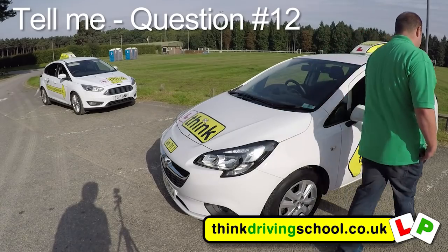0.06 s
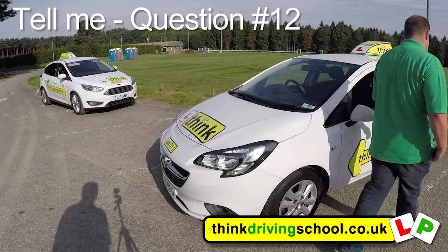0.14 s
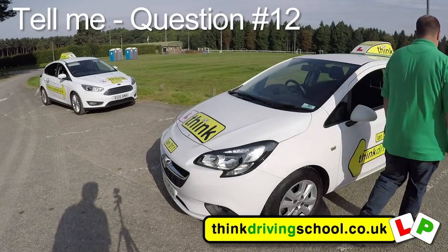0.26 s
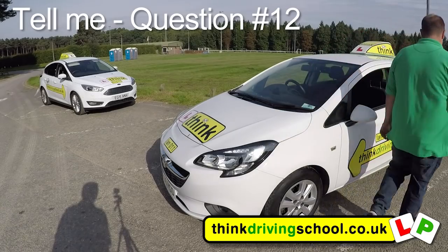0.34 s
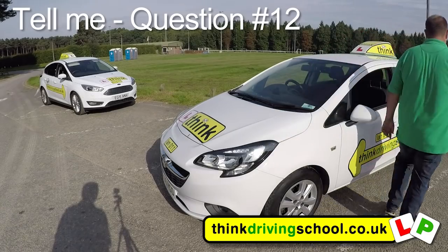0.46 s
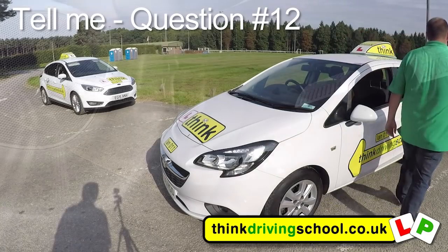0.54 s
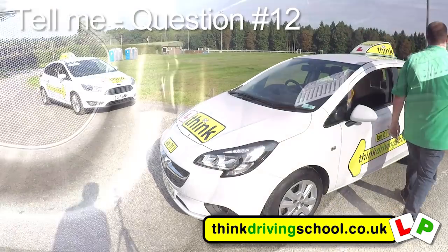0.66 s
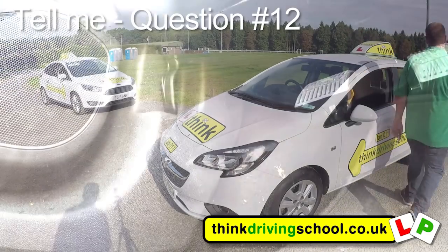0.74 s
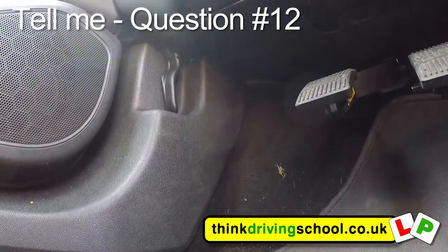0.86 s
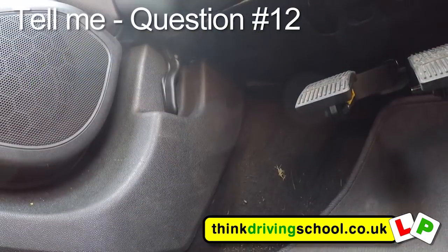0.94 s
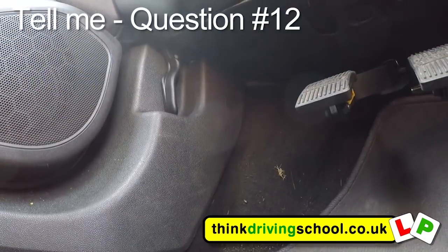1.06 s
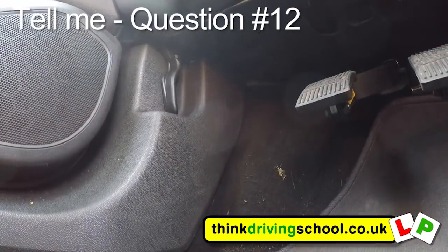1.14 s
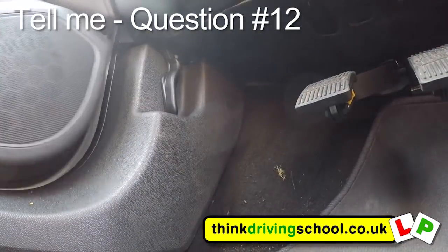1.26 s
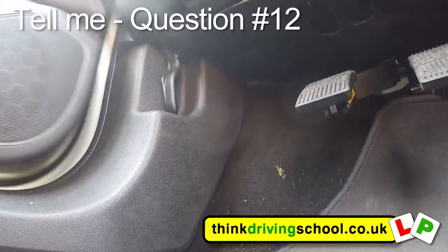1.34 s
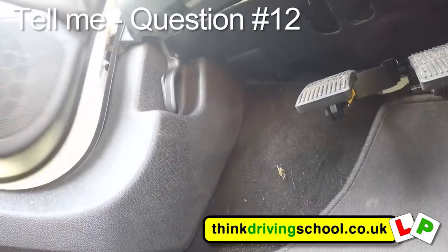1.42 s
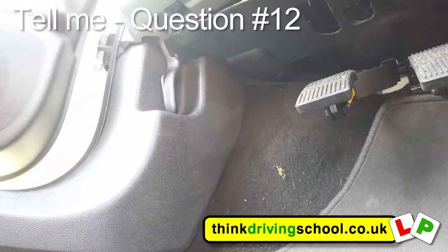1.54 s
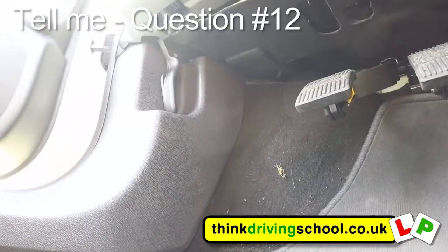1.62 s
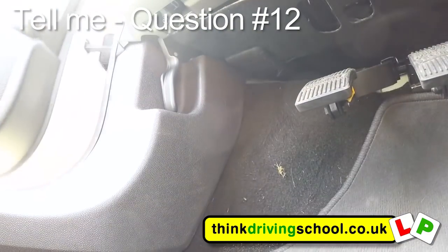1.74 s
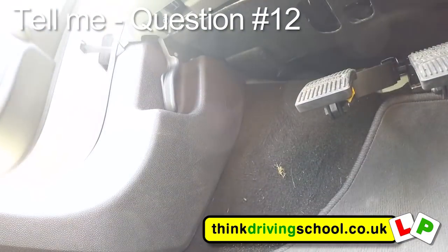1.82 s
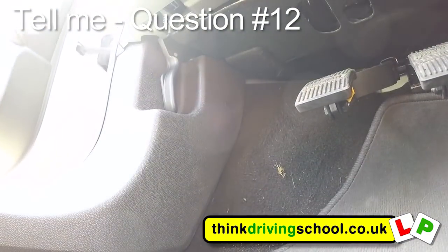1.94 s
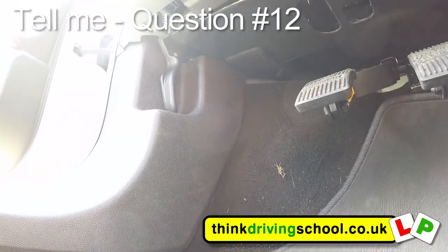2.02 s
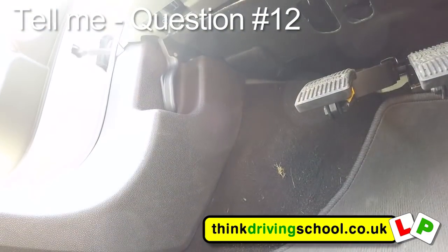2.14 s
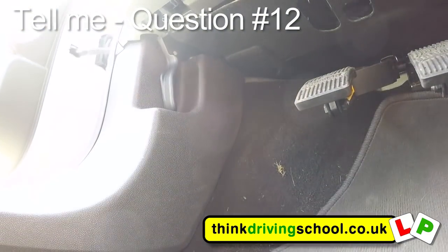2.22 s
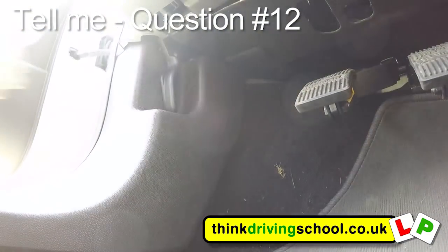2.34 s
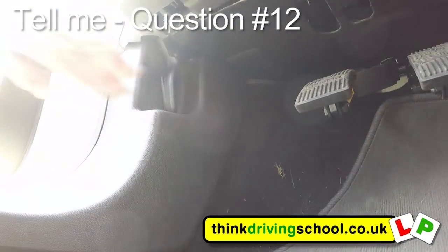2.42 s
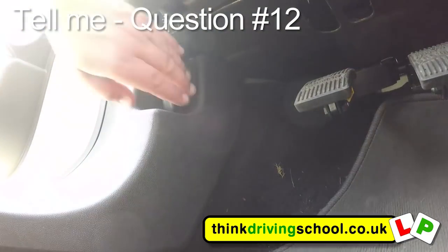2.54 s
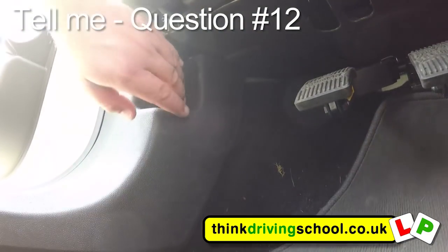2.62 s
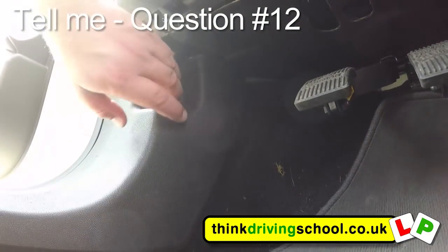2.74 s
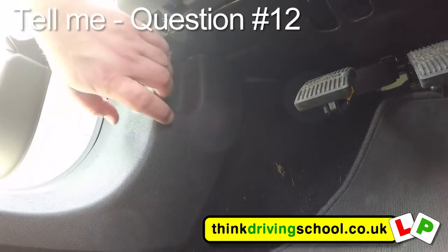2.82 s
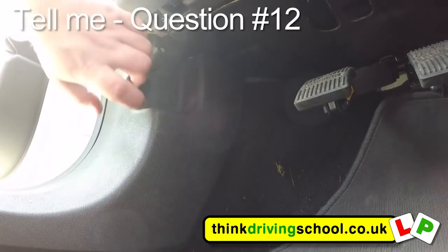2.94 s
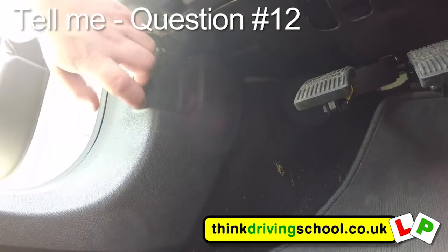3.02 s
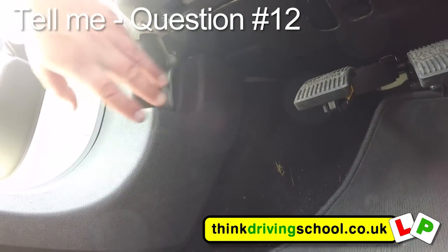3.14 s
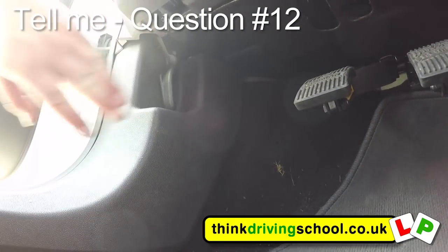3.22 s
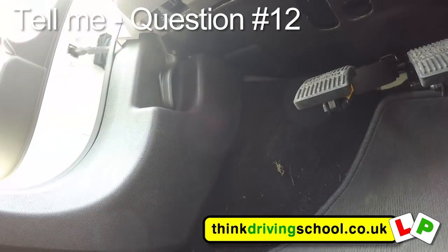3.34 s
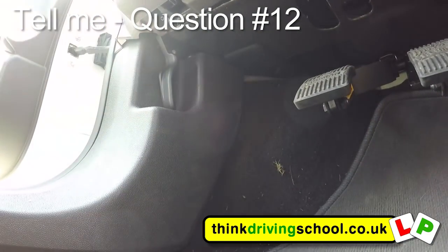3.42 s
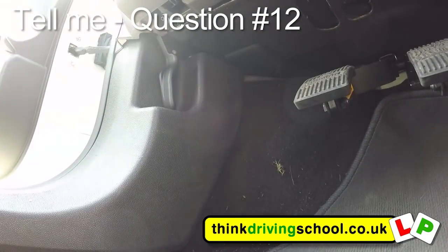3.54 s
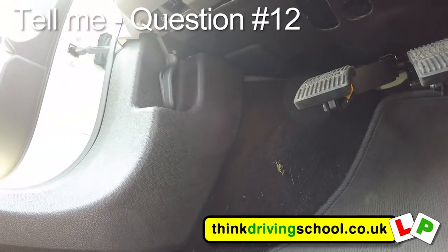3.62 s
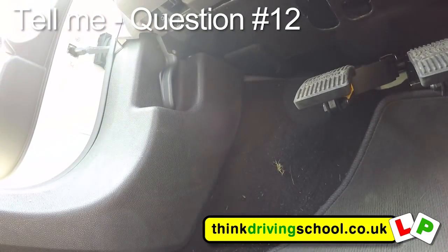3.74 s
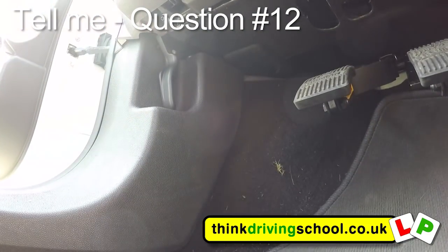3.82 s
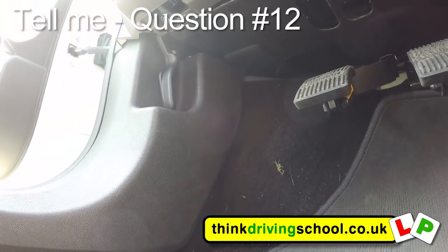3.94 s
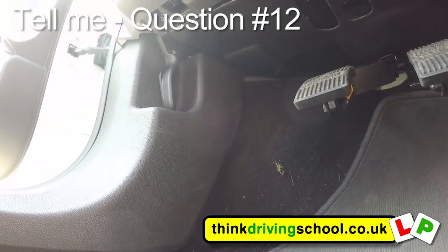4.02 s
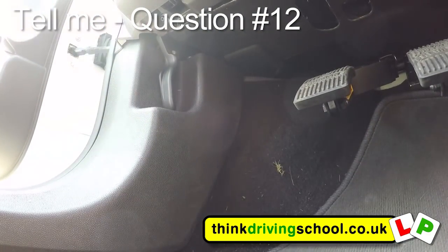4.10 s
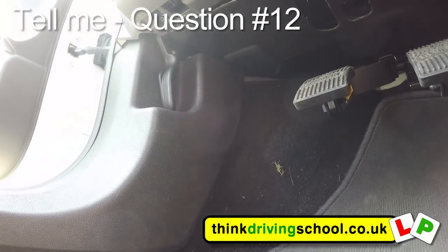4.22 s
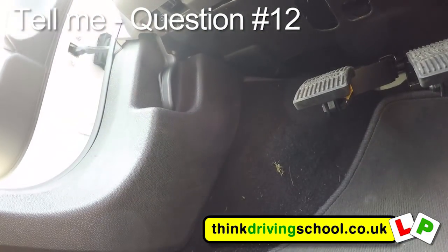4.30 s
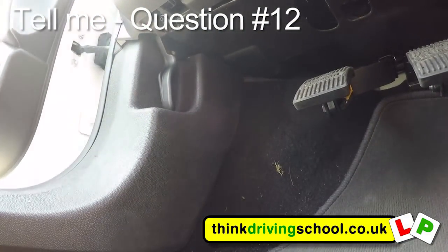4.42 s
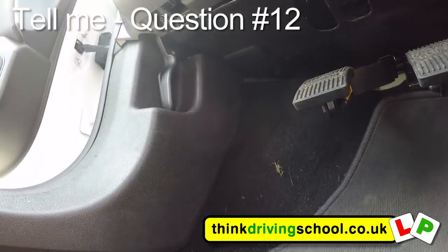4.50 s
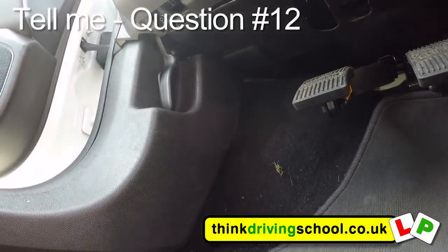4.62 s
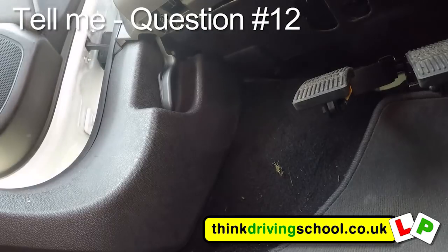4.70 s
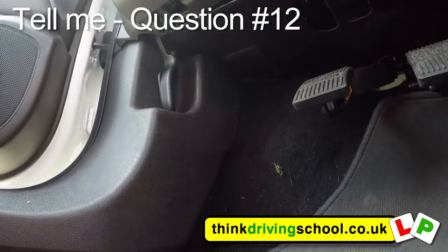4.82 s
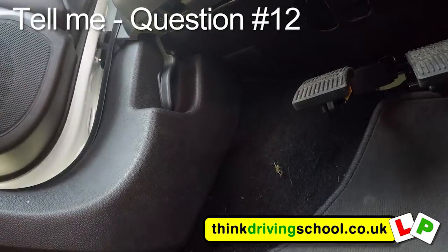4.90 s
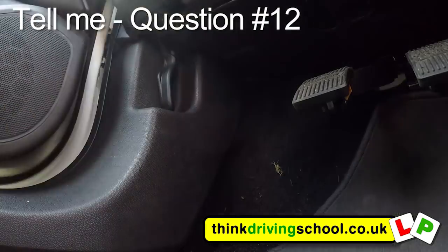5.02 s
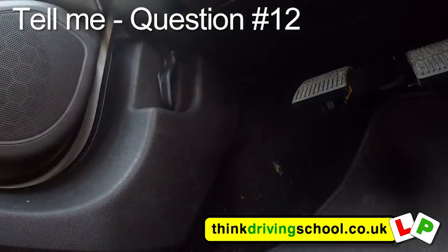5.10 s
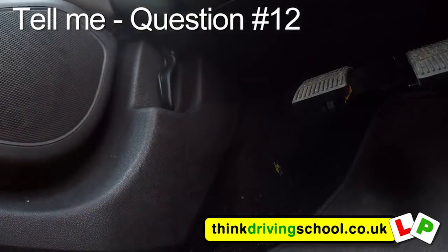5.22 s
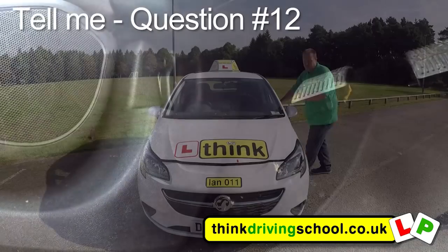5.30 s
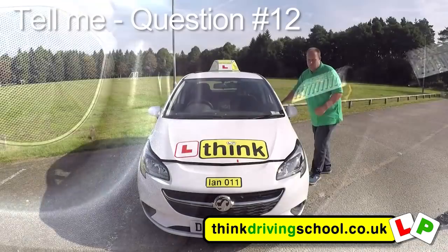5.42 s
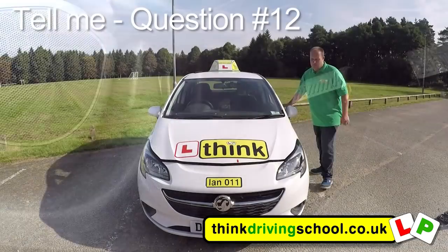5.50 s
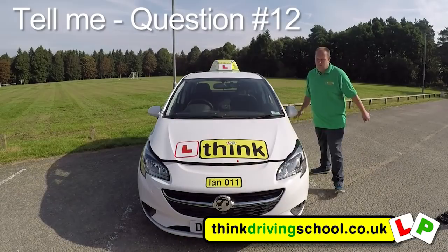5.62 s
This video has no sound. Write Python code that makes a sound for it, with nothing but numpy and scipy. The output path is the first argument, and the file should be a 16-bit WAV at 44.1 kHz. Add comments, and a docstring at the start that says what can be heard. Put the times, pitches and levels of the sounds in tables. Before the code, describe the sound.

A few gritty footsteps, then boomy car door opening, a sharp lever pull and release, light rattling clicks, and a loud dull door slam.

```python
"""A car door opens, a hand pulls the bonnet lever in the footwell, and the door is shut again.
Blows ring the car body as thuds and swing a low cabin boom; latch, lever and stay click as short noise snaps.
Scrapes and rubbing are noise broken into slips, and the door seal creaks by stick-slip.
Gravel steps outdoors come first, then the car floor, then outdoors again, over far road noise."""
import sys
import numpy as np
from scipy import signal
from scipy.fft import rfft, irfft
from scipy.io import wavfile
from scipy.ndimage import uniform_filter1d

SR = 44100
rng = np.random.default_rng(int(sys.argv[2]) if len(sys.argv) > 2 else 0)


def wav_record(signal):
    """Record a signal, one row per channel, as 16-bit PCM in the file named by sys.argv[1]."""
    frames = np.transpose(np.atleast_2d(signal))
    bounded = np.clip(frames, -1, 1)
    # unit amplitude maps onto the largest positive 16-bit level
    quanta = np.round(bounded * 32767).astype(np.int16)
    wavfile.write(sys.argv[1], SR, quanta)


N = 249606


def amp(db):
    """Gain of a level in dB."""
    return 10 ** (np.asarray(db) / 20)


def evened(x):
    """Scaled to rms 1."""
    return x / np.sqrt(np.mean(x ** 2) + 1e-20)


def read(points, hz):
    """A spectrum in dB read on a log-frequency axis, -90 dB beyond its ends."""
    f, value = np.transpose(points)
    return np.interp(np.log(hz + 1), np.log(f + 1), value, left=-90, right=-90)


def curve(rows):
    """Each column after the time, interpolated to every sample."""
    s, *columns = np.transpose(rows)
    return [np.interp(np.arange(N) / SR, s, c) for c in columns]


def add(mix, s, sound, pan_db=0):
    """Adds a sound at time s; pan_db is left re right."""
    part = mix[:, round(s * SR):][:, :sound.shape[-1]]
    part += (sound * amp([[pan_db / 2], [-pan_db / 2]]))[:, :part.shape[1]]


def pair(both, apart, share):
    """Left and right from a common part and a part of opposite sign."""
    return np.array([both + share * apart, both - share * apart])


def bands(x, edges_hz):
    """Splits a sound into neighbouring bands with soft edges."""
    hz = np.fft.rfftfreq(x.shape[-1], 1 / SR) + 1
    lowpasses = [1 / (1 + (hz / edge) ** 10) for edge in edges_hz]
    below = [np.zeros_like(hz)] + lowpasses + [np.ones_like(hz)]
    return [irfft(rfft(x) * (hi - lo), x.shape[-1]) for lo, hi in zip(below, below[1:])]


def noise(colour, patchy_db=2.5, size=1024):
    """Two partly alike channels of coloured noise whose spectrum drifts in patches."""
    # left-right likeness of spread-out sound: f/Hz, correlation (-1 to 1)
    likeness = [(60, -0.58), (120, 0.63), (240, 0.16), (490, -0.66), (980, -0.81), (1980, -0.47),
                (3970, -0.06), (7990, -0.58)]
    frames, hz = 4 * N // size + 5, np.fft.rfftfreq(size, 1 / SR)
    a, b, c, d, patches = rng.standard_normal((frames, len(hz), 5)).T
    patches = uniform_filter1d(patches, size=10, axis=0)
    patches = evened(uniform_filter1d(patches, size=8, axis=1))
    same = np.clip(np.interp(hz, *np.transpose(likeness)), -1, 1)[:, None]
    left = a + 1j * b
    right = same * left + np.sqrt(1 - same ** 2) * (c + 1j * d)
    z = np.array([left, right]) * amp(read(colour, hz)[:, None] + patchy_db * patches)
    x = signal.istft(z, nperseg=size, noverlap=size * 3 // 4)[1]
    return evened(x[:, :N])


def slips(size, per_s, smooth):
    """A level broken into small decaying slips of uneven size over a smooth share."""
    decay_s = 0.0037
    starts = amp(3.2 * rng.exponential(1, size)) * (rng.random(size) < per_s / SR)
    grains = signal.lfilter([1], [1, -np.exp(-1 / (decay_s * SR))], starts)
    return evened(smooth + evened(grains))


def snap(draw, band_db):
    """Noise in one common colour with random resonances, in dull, middle and bright (widest) bands."""
    # common colour of snaps and scrapes: f/Hz, level/dB
    snap_colour = [(700, 7.5), (1200, 8.5), (1700, 9.5), (2200, 3.5), (3200, 5.5), (4200, 0.5), (5000, -6),
                   (6600, -5.5), (8000, -14), (9000, -23), (12000, -36.5), (15000, -45)]
    resonant_db = 4.5  # spread of the random resonances, drawn every 300 Hz
    hz = np.fft.rfftfreq(draw.shape[1], 1 / SR)
    resonances = np.interp(hz, np.arange(80) * 300, rng.standard_normal(80))
    coloured = irfft(rfft(draw) * amp(read(snap_colour, hz) + resonant_db * resonances))
    split, widths = bands(coloured, (2400, 4800)), (.8, .45, 1.2)
    return sum(amp(d) * evened(pair(*b, width)) for d, b, width in zip(band_db, split, widths))


def field_before():
    """Far road noise as steady coloured noise, without its lows."""
    # spectrum: f/Hz, density/dB per Hz
    road_colour = [(60, -3), (160, -2.5), (330, -17), (550, -16), (1240, -16.5), (3000, -39), (8400, -37),
                   (11000, -40.5), (14500, -54)]
    level_db, low_cut_hz = -46.5, 156
    low_cut = signal.butter(10, low_cut_hz, "high", fs=SR, output="sos")
    return amp(level_db) * evened(signal.sosfilt(low_cut, noise(road_colour, .8, size=1024)))


def field_after():
    """Far road noise and wind as patchy noise with strong lows."""
    # spectrum: f/Hz, density/dB per Hz
    wind_colour = [(12, -20), (22, 0.5), (112, -8), (150, -12), (245, -13.5), (500, -22), (1060, -22),
                   (2400, -36.5), (8400, -41), (11000, -41), (14500, -59)]
    level_db = -39
    return amp(level_db) * noise(wind_colour, size=2048)


def hiss():
    """Faint steady coloured noise at the car floor."""
    # spectrum: f/Hz, density/dB per Hz
    hiss_colour = [(400, -14), (900, -2.5), (1600, 0), (2600, -12.5), (6900, -13.5), (10000, -8.5),
                   (12000, -21.5), (14500, -27)]
    level_db = -62.5
    return amp(level_db) * noise(hiss_colour, patchy_db=1)


def rocking():
    """Car floor lows: slow pressure lumps with boom noise tied to them, and a rumble with its own level."""
    # levels of the lows: t/s, sway under the boom/dB, rumble over it/dB
    low_levels = [(0.7, -72, -36), (0.78, -31.5, -44), (1.02, -50, -39.5), (1.11, -25, -19),
                  (1.31, -27, -38), (1.62, -34, -36.5), (2.06, -28.5, -31), (2.5, -32, -37.5),
                  (2.81, -43, -23.5), (2.99, -44, -20.5), (3.06, -29, -21), (3.27, -23.5, -34.5),
                  (3.56, -30.5, -39.5), (4.03, -30.5, -37.5), (4.08, -17.5, -32.5), (4.4, -21.5, -32),
                  (5.17, -32.5, -34.5), (5.27, -23, -33), (5.46, -27, -27.5)]
    # spectrum: f/Hz, density/dB per Hz
    rumble_colour = [(29, -77), (50, 1), (90, 1), (182, -9.5), (247, -15), (395, -21), (900, -31.5),
                     (1170, -63), (1980, -120)]
    boom_db, boom_sway_db = -54, -33.5  # boom level, and the sway level at which it holds
    sway_db, rumble_db = curve(low_levels)
    sway = noise([(8, -35), (20, -7.0), (40, -13), (55, -1.0), (70, -52)], size=4096)
    boom = noise([(35, -47), (52, -5.0), (66, 17.0), (82, -7.0), (100, -10.5)], size=4096)
    boom *= amp(boom_db + 0.8 * (sway_db - boom_sway_db))
    return amp(sway_db) * sway + boom + amp(rumble_db) * noise(rumble_colour, size=2048)


def rubbing():
    """Clothes on upholstery: a soft rustle, uneven from many small slips."""
    # rustle in two bands: t/s, dull level/dB, bright level/dB
    rub_levels = [(0.0, -53.5, -64), (0.56, -63, -73), (0.7, -63, -74), (0.97, -62.5, -103),
                  (1.37, -60, -64), (2.1, -47.5, -54), (2.57, -53, -59.5), (2.95, -47.5, -55),
                  (3.19, -60.5, -65.5), (3.53, -56.5, -62.5), (3.77, -50.5, -55), (4.44, -50, -54.5),
                  (4.85, -53, -57.5), (5.08, -50, -55.5), (5.23, -43.5, -54), (5.46, -47, -58)]
    # spectrum: f/Hz, density/dB per Hz
    rub_colour = [(400, -33), (600, -5.5), (1000, -6), (1230, -8.5), (1700, -11), (2500, -14), (3500, -7.5),
                  (5000, -11), (6300, -5.5), (8400, -11.5), (11000, -15), (14500, -29)]
    dull_db, bright_db = curve(rub_levels)
    dull, bright = bands(noise(rub_colour, patchy_db=1.5, size=256), (2600,))
    rustle = amp(dull_db) * evened(dull) + amp(bright_db) * evened(bright)
    return slips(N, 380, 15.0) * rustle


def scrapes():
    """Gravel, lever, hinge and door seal: dense runs of slips that swell and fade."""
    # short scrapes: t/s, length/s (0.18 at most), dull level/dB, bright re dull/dB
    scrape_rows = [(0.138, 0.15, -49, -5.5), (0.618, 0.14, -60.5, -2), (1.034, 0.17, -50, -10),
                   (1.472, 0.12, -48, -8.5), (2.062, 0.16, -51.5, -27), (2.676, 0.22, -46.5, -8),
                   (2.849, 0.089, -40.5, -12), (2.981, 0.064, -51, 1), (3.079, 0.078, -36, -4),
                   (3.677, 0.087, -60.5, 6.5), (4.257, 0.088, -45.5, 3), (5.041, 0.095, -62, -6),
                   (5.241, 0.17, -38.5, -6)]
    middle_db, longest_s = -4, .18  # middle is re dull
    out = np.zeros((2, N))
    for s, length_s, db, bright_db in scrape_rows:
        draw, grain = rng.standard_normal((2, 8192)), slips(8192, 280, 1.0)
        swell = signal.windows.tukey(round(min(length_s, longest_s) * SR), .9)
        rough = snap(draw, (0, middle_db, bright_db)) * grain
        add(out, s, amp(db) * rough[:, :len(swell)] * swell)
    return out


def creak():
    """Rubber seal: uneven, quickening stick-slip impulses ring its resonances as the door closes."""
    # resonances of the seal: f/Hz, width/Hz, level/dB
    seal_modes = [(507, 200, 6), (775, 86, 7), (1160, 39, -3), (1710, 170, 8), (1910, 130, -7)]
    start_s, length_s, level_db = 5.05, .116, -40
    first_per_s, last_per_s = 65, 175  # slip rate
    rise_s, fall_s, edge_db = 0.029, 0.0025, -15  # edge_db: level at both ends re the middle
    out = np.zeros((2, N))
    t = np.arange(0, length_s, 1 / SR)
    progress = np.minimum(np.arange(8192) / SR / (.75 * length_s), 1)
    per_s = first_per_s + (last_per_s - first_per_s) * progress ** 3
    jitter = evened(uniform_filter1d(rng.standard_normal(8192), size=300))
    turns = np.cumsum(per_s * (1 + .2 * jitter))[:len(t)] / SR
    releases = np.diff(np.floor(turns), prepend=0) > 0
    slip = releases * amp(2.1 * rng.standard_normal((2, 8192)))[:, :len(t)]
    u = t[:900]
    ring = sum(amp(d) * np.exp(-np.pi * w * u) * np.sin(2 * np.pi * f * u) for f, w, d in seal_modes)
    rung = evened(signal.oaconvolve(slip, ring[None], axes=1)[:, :len(t)])
    edge = np.clip(np.maximum(1 - t / rise_s, 1 - (length_s - t) / fall_s), 0, 1)
    add(out, start_s, amp(level_db + edge_db * edge) * rung)
    return out


def squeak():
    """A spring squeaks faintly: one short sine that swells and fades."""
    start_s, length_s, f_hz, level_db = 3.235, .07, 4600, -65
    out, t = np.zeros((2, N)), np.arange(round(length_s * SR)) / SR
    add(out, start_s, amp(level_db) * np.sin(2 * np.pi * f_hz * t) * np.hanning(len(t)))
    return out


def booms():
    """Cabin air and panels swing as one low tone that swells and dies with each jolt."""
    # shudders: peak t/s, f/Hz, level/dB, rise/s, t60/s, left re right/dB, left's phase lead/rad
    shudders = [(1.111, 62.8, -28, 0.018, 2.2, -2, 0.32), (1.532, 79, -26, 0.031, 1.03, -1, 0.61),
                (2.03, 59.6, -21.5, 0.099, 0.075, 7, 0.53), (2.872, 64.44, -11.5, .04, 1.6, -0.5, 0.61),
                (3.081, 62, -15, 0.021, 1.9, -7, 1.26), (4.071, 58.5, -17.5, 0.018, 3.9, -1.5, 2.8),
                (4.53, 73.1, -24.5, 0.082, 0.39, -17, 3.3), (4.758, 74.1, -15.5, .09, 0.54, -11, 3.5),
                (5.0, 57.6, -22.5, .12, 0.2, -7.5, 3), (5.131, 65.4, -22.5, .07, 0.44, -3, .72),
                (5.287, 67.5, -7, 0.068, 0.09, -6, .28)]
    start_db, longest_s = -28, 0.25  # start re the peak; tail cut-off after the peak
    out = np.zeros((2, N))
    for s, hz, db, rise_s, t60_s, pan_db, lead in shudders:
        t = np.arange(-rise_s, min(longest_s, t60_s / 2), 1 / SR)
        phase = 2 * np.pi * hz * (t + rise_s)
        swing = np.sin([phase + lead, phase]) * signal.windows.tukey(len(t), .25)
        swell_db = np.where(t < 0, -start_db * t / rise_s, -60 * t / t60_s)
        add(out, s - rise_s, np.sqrt(2) * amp(db + swell_db) * swing, pan_db)
    return out


def clicks():
    """Latch, lever, stay and gravel: fast noise snaps with a faint longer ring; the lever also pings."""
    # snaps: t/s, dull peak level/dB, bright re dull/dB, t60/s
    click_rows = [(0.0521, -40.5, -16, 0.03), (0.0626, -41, -13, 0.017), (0.073, -34.5, -22, 0.0092),
                  (0.158, -36, -12, 0.015), (0.178, -36, -7, 0.016), (0.2165, -28, -9, 0.029),
                  (0.245, -34.5, -15, 0.0097), (0.259, -43, -11, 0.015), (0.291, -49.5, 7.5, 0.022),
                  (1.1111, -25, -8, 0.037), (1.1282, -27.5, -9, 0.039), (1.1927, -41, -14, 0.067),
                  (1.5234, -21, -2.5, 0.046), (1.653, -44.5, 3.5, 0.06), (1.8897, -29.5, 1, 0.0078),
                  (1.9515, -42, 5.5, 0.021), (2.1017, -33.5, -29, 0.04), (2.1497, -30, -14, 0.029),
                  (2.1826, -35.5, -5, 0.048), (2.2506, -43, 7, 0.019), (2.612, -5.5, -27, 0.019),
                  (2.643, -42, 5, 0.015), (2.731, -27, 2.5, 0.013), (2.745, -18.5, -13.5, 0.02),
                  (2.8597, -14, -9.5, 0.03), (2.879, -20, -13, 0.028), (3.1141, -2, -21, 0.0083),
                  (3.118, -8, 4, 0.015), (3.1248, -13.5, 2, 0.0068), (3.4102, -40, 3, 0.022),
                  (3.473, -60.5, 18, 0.015), (3.5879, -37.5, -15, 0.025), (3.6376, -54.5, 22, 0.018),
                  (3.6683, -48.5, 9, 0.042), (3.7333, -32, -5, 0.017), (3.8713, -27, -6, 0.023),
                  (4.0937, -59, -12, 0.019), (4.12, -47, -7, 0.041), (4.269, -34.5, -15, 0.029),
                  (4.362, -42, 23.5, 0.0088), (4.4459, -31, 10.5, 0.03), (4.4866, -36.5, 4, 0.037),
                  (4.5035, -38.5, 16.5, 0.014), (4.552, -52, 16.5, 0.044), (4.687, -35, 25.5, 0.0047),
                  (4.695, -34, 2, 0.06), (4.7417, -41.5, 14, 0.025), (4.753, -39, 16, 0.013),
                  (4.7924, -49.5, 17.5, 0.028), (5.2243, -21, -3, 0.051), (5.244, -7, -11, 0.046),
                  (5.2594, -10.5, -7.5, 0.069), (5.2724, -23.5, 2.5, 0.051), (5.342, -40, -3, 0.027),
                  (5.3564, -21, -6, 0.012)]
    # middle re dull for gravel, latch and lever, cable release, door stay, slam: until t/s, level/dB
    middle_rows = [(.7, -1), (3.117, -6.5), (3.2, 4.5), (5.2, -9.5), (6, -11)]
    middle_per_bright = 0.18  # dB per dB
    tail_db, tail_t60_s = -20.5, 0.059
    crest, pan_db = 2.7, -0.5  # crest: peak over rms of a noise burst
    out, t = np.zeros((2, N)), np.arange(2048) / SR
    draws = rng.standard_normal((len(click_rows), 2, len(t)))
    for (s, db, bright_db, t60_s), draw in zip(click_rows, draws):
        swell = 1 - np.exp(-t / (.09 * t60_s))
        fall = (amp(-60 * t / t60_s) + amp(tail_db - 60 * t / tail_t60_s)) * swell
        middle_db = next(d for until, d in middle_rows if s < until) + middle_per_bright * bright_db
        burst = snap(draw, (0, middle_db, bright_db)) * fall / (crest * fall.max())
        add(out, s - .001, amp(db) * burst, pan_db)
    ping_s, ping_hz, ping_db, ping_t60_s = 2.613, 3200, -19, .03
    add(out, ping_s, amp(ping_db - 60 * t / ping_t60_s) * np.sin(2 * np.pi * ping_hz * t))
    return out


def thuds():
    """Blows on the body, and a few one-sided puffs of wind near 2.45, 3.38, 4.06 and 4.33 s: a soft short
    rattle rings three mode groups; harder ones wake the higher ones."""
    # blows and wind puffs: t/s, floor pan peak level/dB, hardness as trim re floor pan/dB
    blows = [(1.074, -23.5, -17), (1.106, -3, -15), (1.192, -19.5, -11), (1.444, -23, -19),
             (1.494, -19, -12), (1.524, -1.5, -15.5), (1.556, -11.5, -21), (1.586, -12.5, -25),
             (1.648, -9, -16), (1.932, -11, -22.5), (2.274, -19, -19), (2.448, -27.5, -30),
             (2.605, -30.5, 16.5), (2.779, -28.5, 10), (2.858, -6, -6), (2.88, -16, 0), (2.902, -11.5, -8),
             (3.0, -10, -11), (3.071, -9, -12.5), (3.113, -12, -10), (3.143, -7, -49), (3.381, -27, -42),
             (4.06, -27, -20), (4.155, -11.5, -27.5), (4.332, -26, -36), (4.445, -20, -8.5),
             (4.486, -7.5, -15), (4.549, -18.5, -21), (4.692, -18.5, -7), (4.73, -9.5, -11.5),
             (4.781, -9, -30), (5.121, -19, -7.5), (5.226, -8.5, -2.5), (5.244, -2.5, -10),
             (5.263, -5.5, -5), (5.3, -14.5, -7), (5.337, -12, -2)]
    # body modes, low to high: f/Hz, level/dB, t60/s
    body_modes = [(99, -9.5, 0.25), (128.4, -2.5, 0.17), (162, -9, 0.23), (213, -2.5, 0.33),
                  (252.4, 6.5, 0.081), (292.8, 1.5, 0.11), (323, 6, 0.047), (386.6, -0.5, 0.13),
                  (426.5, -4, 0.05), (613, 6, 0.016), (725, -0.5, 0.021), (790, -7.5, 0.036),
                  (937, 0.5, 0.02), (1130, -49, .04)]
    # each triple: floor pan, door skin, trim
    widths, pans_db = (0.85, 0.51, 0.75), (-8, -3, 4.5)  # pan: left re right
    skin_db, skin_per_trim = 4, 0.64  # skin re floor pan at hardness 0 dB; dB per dB of hardness
    rattle_s, rattle_spread = 0.0087, 0.33  # time to the rattle's peak; its random log spread
    out, t = np.zeros((2, N)), np.arange(SR // 6) / SR
    draws = rng.standard_normal((len(blows), 2, 3000))
    bodies = []
    for modes in (body_modes[:3], body_modes[3:9], body_modes[9:]):
        ring = sum(amp(d - 60 * t / t60_s) * np.sin(2 * np.pi * f * t) for f, d, t60_s in modes)
        # the blow stays dull above the modes it rings
        padding = signal.butter(3, 1.3 * modes[-1][0], fs=SR, output="sos")
        bodies.append(signal.sosfilt(padding, ring))
    for (s, db, trim_db), (both, apart) in zip(blows, draws):
        u = t[:3000] / (rattle_s * np.exp(rattle_spread * apart[0]))
        groups_db = 0, skin_db + skin_per_trim * trim_db, trim_db
        for body, group_db, pan_db, width in zip(bodies, groups_db, pans_db, widths):
            rattle = pair(both, apart, width) * u * np.exp(-u)
            rung = signal.fftconvolve(rattle, body[None], axes=1)
            add(out, s - .005, amp(db + group_db) * rung / abs(rung).max(), pan_db)
    return out


def scene():
    """Outdoors, then the footwell, then outdoors again; the small contact sounds span the first two."""
    in_s, out_s, fade_s = .73, 5.452, 0.0033
    t = np.arange(N) / SR
    came_in, left = (np.clip((t - s) / fade_s, 0, 1) for s in (in_s, out_s))
    outdoors = field_before() * (1 - came_in) + field_after() * left
    car = hiss() + rocking() + creak() + squeak() + booms() + thuds()
    contacts = rubbing() + scrapes() + clicks()
    return outdoors + car * came_in * (1 - left) + contacts * (1 - left)


def record(dry):
    """Stereo width over time, soft rounding of the loudest peaks, then a band limit."""
    # the car floor starts in mono, then widens: t/s, side gain/dB
    side_gain = [(.73, -3.5), (.736, -103), (2.09, -84), (2.12, -26), (2.55, -7)]
    edge_hz = 15200
    mid = (dry[0] + dry[1]) / 2
    side = (dry[0] - dry[1]) / 2 * amp(curve(side_gain)[0])
    soft = 1.15 * np.tanh(np.array([mid + side, mid - side]) / .98)
    band_limit = signal.firwin(511, edge_hz, window=("kaiser", 9), fs=SR)
    return signal.oaconvolve(soft, band_limit[None], "same")


dry = scene()
out = record(dry)
wav_record(out)
```